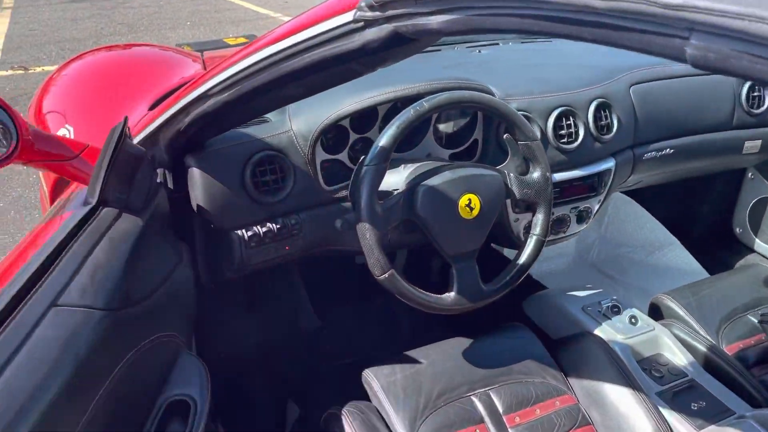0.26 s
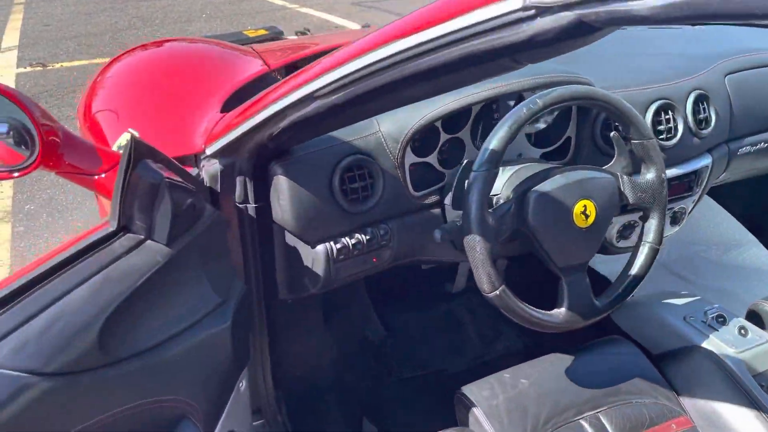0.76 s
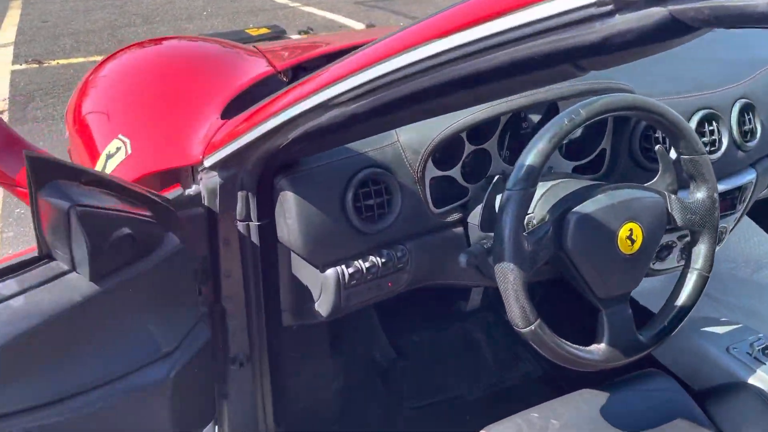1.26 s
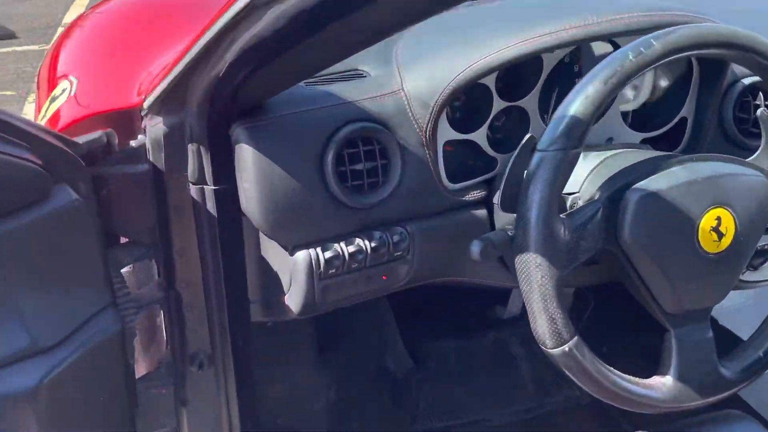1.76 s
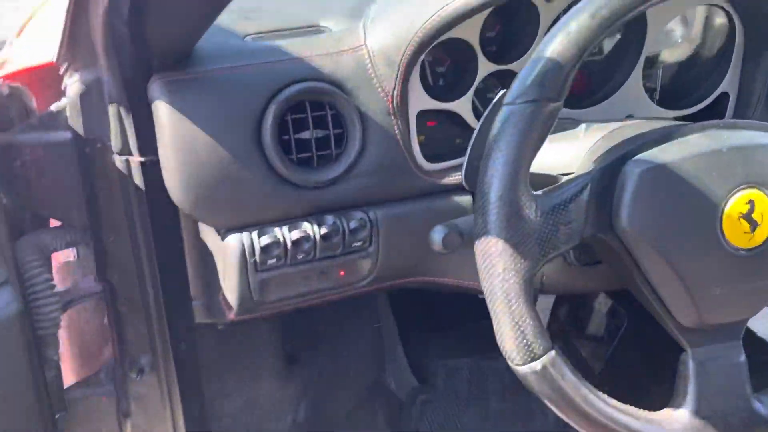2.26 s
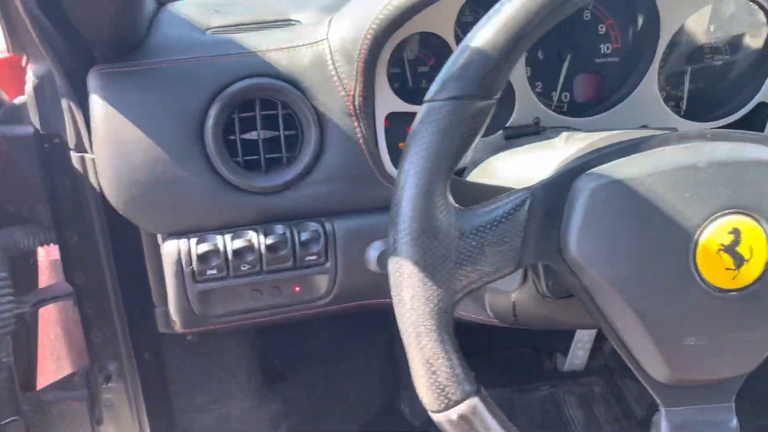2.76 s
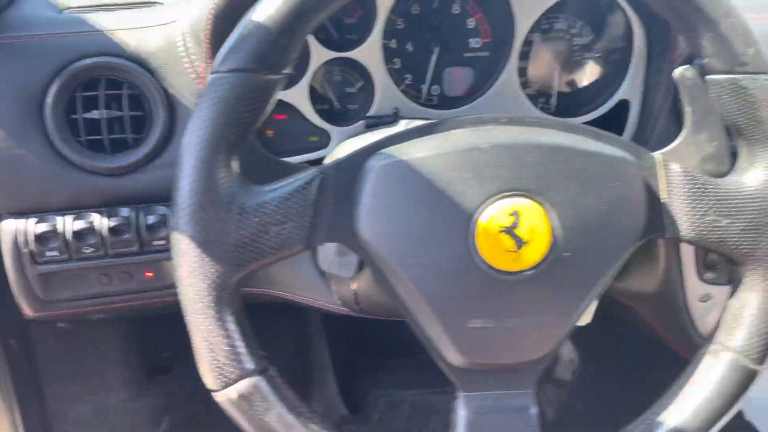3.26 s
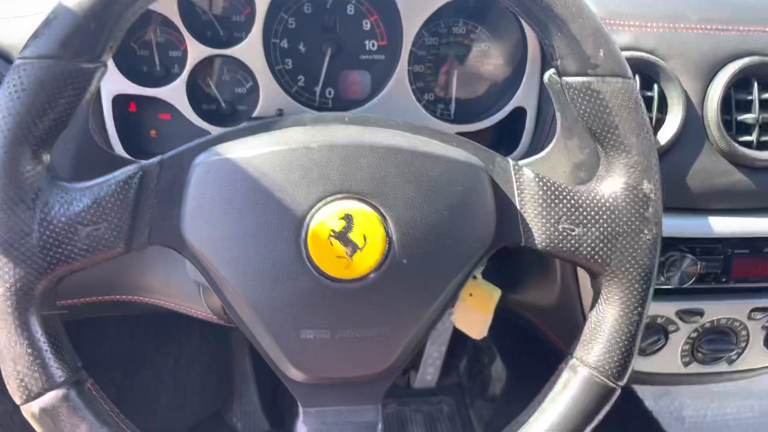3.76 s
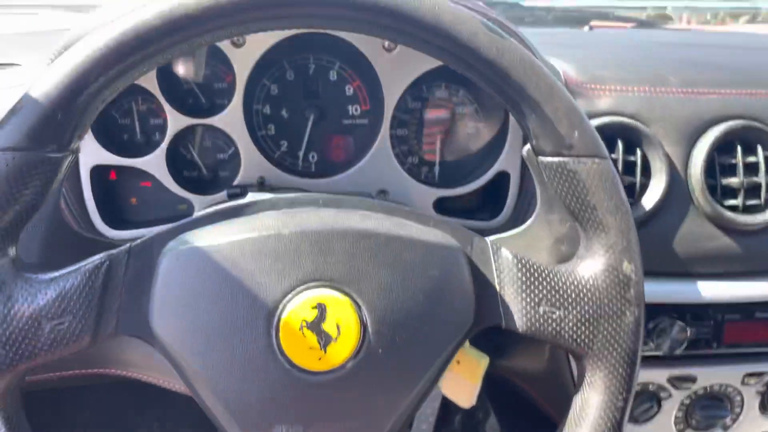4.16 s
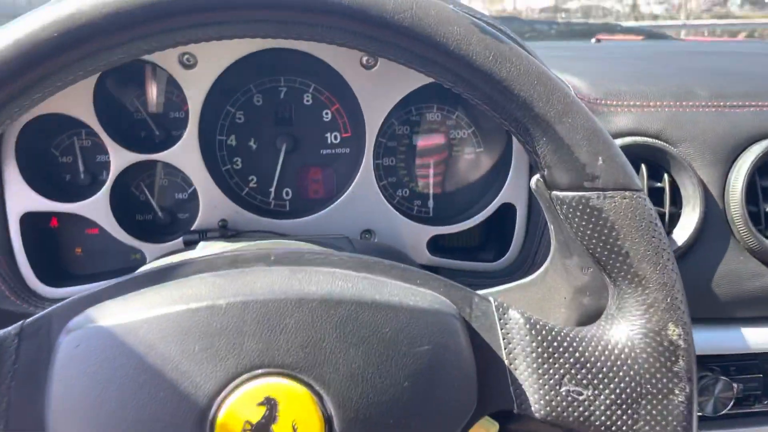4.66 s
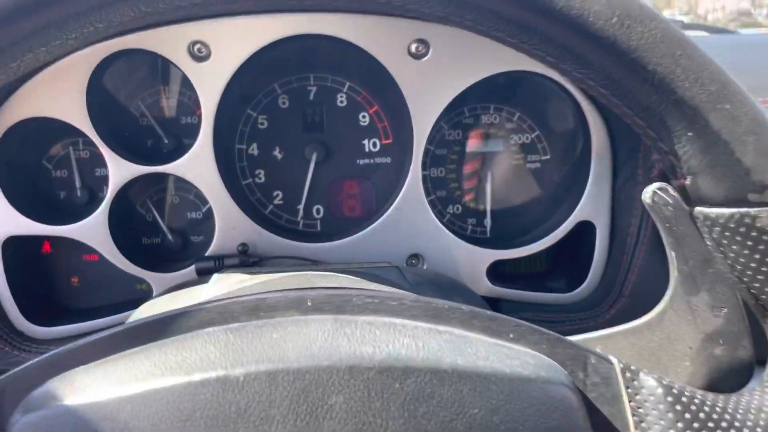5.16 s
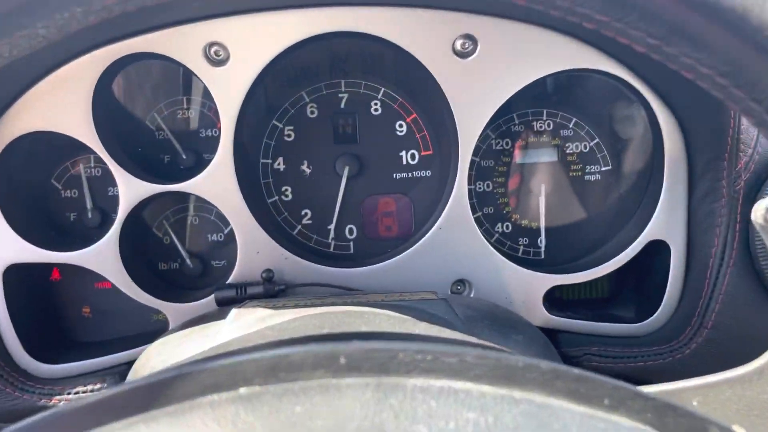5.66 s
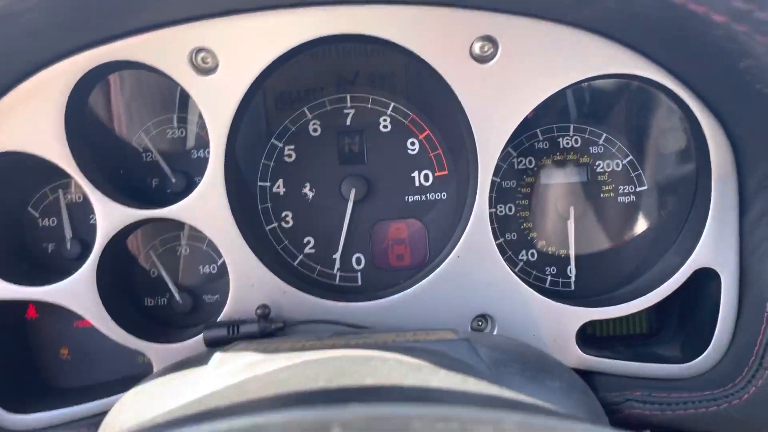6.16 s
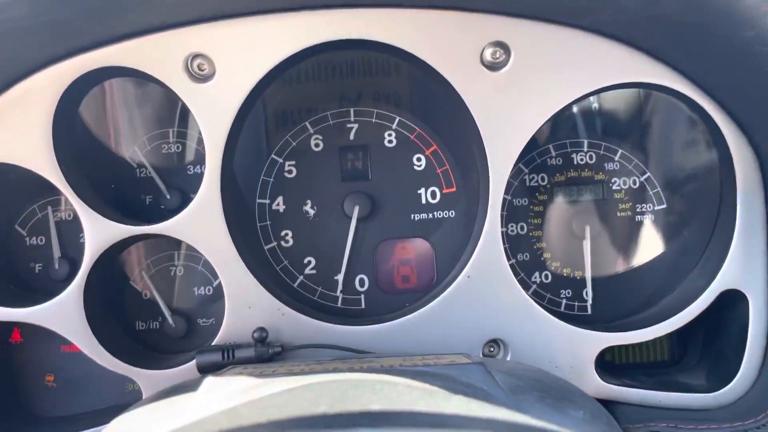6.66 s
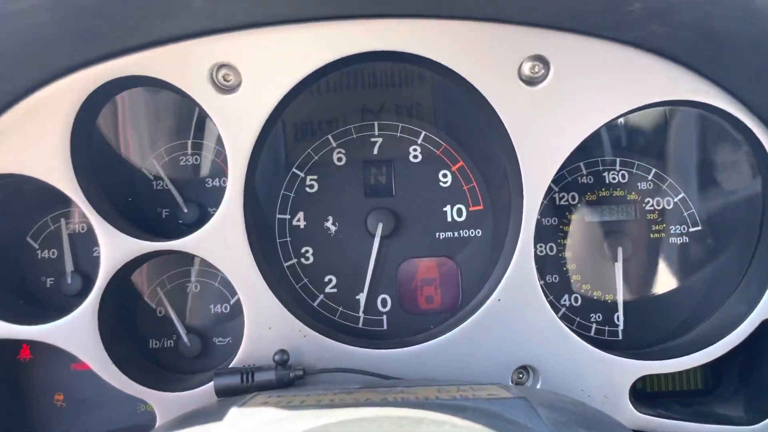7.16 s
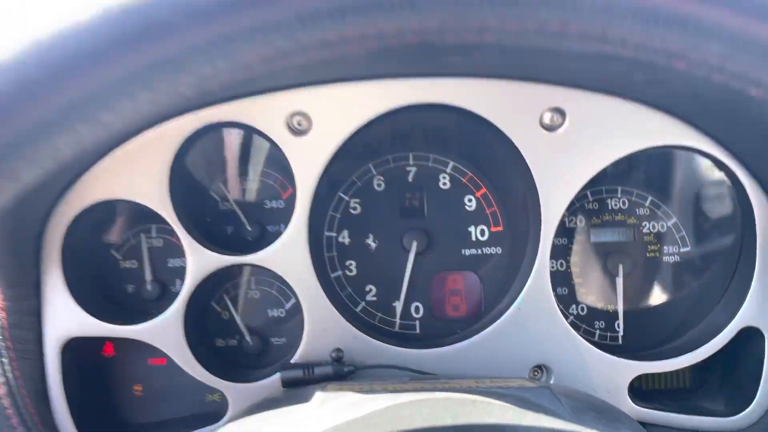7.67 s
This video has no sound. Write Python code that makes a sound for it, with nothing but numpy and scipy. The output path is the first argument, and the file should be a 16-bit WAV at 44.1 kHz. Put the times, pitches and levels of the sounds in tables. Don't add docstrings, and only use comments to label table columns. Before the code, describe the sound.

A sports car engine idles with a deep steady boom and airy hiss, wind buffeting the microphone early, one sharp click, then calmer inside the cabin.

```python
import sys
import numpy as np
from scipy import signal
from scipy.fft import rfft, irfft, next_fast_len
from scipy.io import wavfile
from scipy.ndimage import uniform_filter1d, minimum_filter1d

SR = 44100
rng = np.random.default_rng(int(sys.argv[2]) if len(sys.argv) > 2 else 0)


def persist_wave(psi):
    counts = np.round(np.clip(psi, -1, 1) * 32767).astype(np.int16)
    wavfile.write(sys.argv[1], SR, np.atleast_2d(counts).T)


def elevation(decibels):
    levels = np.asarray(decibels, float)
    return 10 ** (levels / 20)


N = 349272


def rms_one(x):
    return x / np.sqrt(np.mean(x ** 2) + 1e-20)


def in_time(rows):
    s, *columns = np.transpose(rows)
    return [np.interp(np.arange(N) / SR, s, column) for column in columns]


def at_hz(points, hz):
    table_hz, values = np.transpose(points)
    return np.interp(np.log(hz), np.log(table_hz), values)


def panned(db):
    return elevation(np.array([.5 * db, -.5 * db]))


def sheltered(depth, rule):
    outside_db, inside_db, bend = rule
    return outside_db + (inside_db - outside_db) * np.clip(depth, 0, 1) ** bend


def near(depth, place):
    centre, half_width, change = place
    return change * np.exp(-((depth - centre) / half_width) ** 2)


def drift(rate):
    r = np.exp(-80 * np.pi * rate / SR)
    white = rng.standard_normal(N // 40 + 2002)
    slow = signal.lfilter([1], [1, -2 * r, r * r], white)[2000:]
    return np.interp(np.arange(N) / 40, np.arange(len(slow)), rms_one(slow))


def resonance(x, hz, width_hz):
    r = np.exp(-np.pi * width_hz / SR)
    poles = [1, -2 * r * np.cos(2 * np.pi * hz / SR), r * r]
    return signal.lfilter([(1 - r * r) / 2, 0, (r * r - 1) / 2], poles, x)


def banded_noise(spectrum, likeness, patchy_db, rate):
    low, high = spectrum[0][0], min(spectrum[-1][0], .45 * SR)
    edges = np.geomspace(low, high, 10)
    out, together, white = 0, drift(rate), rng.standard_normal((2, 2, N))
    for k, band in enumerate(zip(edges, edges[1:])):
        band_pass = signal.butter(2, band, "band", fs=SR, output="sos")
        mid, side = signal.sosfilt(band_pass, white[k % 2])
        hz = np.sqrt(band[0] * band[1])
        alike = np.clip(at_hz(likeness, hz), 0, 1)
        gain = elevation(at_hz(spectrum, hz) + patchy_db * (.7 * together + drift(rate)))
        out = out + gain * (np.sqrt(1 + alike) * mid + np.sqrt(1 - alike) * side * [[1], [-1]])
    return rms_one(out)


def narrow_noise(hz, width_hz, steady=0):
    shared, own = rng.standard_normal((2, 1, N)), rng.standard_normal((2, 2, N))
    low = signal.butter(2, width_hz / 2, fs=SR, output="sos")
    along, across = rms_one(signal.sosfilt(low, shared + .9 * own))
    turn = 2 * np.pi * np.cumsum(hz) / SR
    return rms_one((along + 2 * steady) * np.cos(turn) + across * np.sin(turn))


def swells(starts, lengths, levels_db, rise, fall):
    t, power = np.arange(N) / SR, 1e-9
    for s, length, db in zip(starts, lengths, levels_db):
        shape = np.interp(t, [s - rise, s, s + length, s + length + fall], [0, 1, 1, 0])
        power = power + (elevation(db) * shape) ** 2
    return np.sqrt(power)


# (time [s], firing rate [Hz])
IDLE_SPEED = [(0, 68.7), (.95, 69.6), (1.7, 68.8), (2.6, 69.2), (2.9, 68.6), (3.1, 70.1), (3.5, 70.3),
              (3.7, 71.6), (3.9, 72.2), (4.3, 74.7), (4.5, 74.7), (4.75, 73.9), (5.1, 73.4), (5.9, 73.0),
              (6.3, 71.3), (6.7, 71.0), (7.1, 69.0), (7.92, 67.8)]


def firing():
    hz, = in_time(IDLE_SPEED)
    turn = 1.255 + 2 * np.pi * np.cumsum(hz * (1 + 0.0025 * drift(8.5))) / SR
    return hz, turn


# (time [s], firing rate [Hz, not played], firing tone [dB], second order [dB re firing tone])
BOOM_LEVELS = [(0, 68.67, -13, -9), (.95, 69.6, -22, -14), (1.2, 69.3, -24, -7), (1.7, 68.8, -30.5, -5),
               (2.25, 69.23, -35, 12.5), (2.6, 69.34, -25, -0.5), (2.9, 69, -20.5, 4),
               (3.15, 70.5, -18.5, -3), (3.56, 70.67, -19, -2), (3.7, 71.5, -17, -7),
               (4.18, 74.44, -18.5, -5), (4.9, 74.53, -17, -5), (5.64, 73.98, -16, -5),
               (6.05, 72.7, -16, -6), (6.8, 71.42, -14.5, -7), (6.95, 70.75, -15.5, -3.5),
               (7.45, 69.1, -15.5, -3.5), (7.92, 68.14, -15.5, -2.5)]
# (multiple of firing rate, level [dB re second order])
SIDE_ORDERS = [(.5, -20), (.75, -23), (1.75, -24), (2.5, -30), (3, -25), (3.5, -25), (4.5, -31), (5, -33),
               (8.5, -39)]
CABIN_MODE = (298.7, 13.8, 10.8)
FOURTH_ORDER_SHELTER, BOOM_PAN_SHELTER = (-58.5, -39, 0.87), (0.5, -3.5, 0.55)
DOORWAY = (0.51, .07, -4.5)
# (depth, half width, change [dB])
HALF_ORDER_PLACE, HALF_ORDER_FADE = (.68, .14, 5), (1, .05, -5)
# (phase at 69 Hz [rad], slope [rad per Hz])
SECOND_LEAD, FOURTH_LEAD = (-.27, .165), (-1.4, -.3)
SECOND_SPREAD = (.5, .13, .3)
FOURTH_SPREAD = .45


def exhaust_orders(hz, turn, depth):
    _, first_db, second_rel_db = in_time(BOOM_LEVELS)
    second_db = first_db + second_rel_db
    mode_hz, width_hz, mode_db = CABIN_MODE
    apart = np.array([[1], [-1]])

    def mode_lift(order):
        return mode_db * np.exp(-((order * hz - mode_hz) / width_hz) ** 2)

    def pipe_lead(rule):
        return rule[0] + rule[1] * (hz - 69)

    pan_db = sheltered(depth, BOOM_PAN_SHELTER) + near(depth, DOORWAY)
    boom = elevation(first_db + 0.5 * drift(19)) * np.sin(turn) * panned(pan_db)

    second_phase = 2 * turn + pipe_lead(SECOND_LEAD) + near(depth, SECOND_SPREAD) * apart
    upper = elevation(second_db + 1.3 * drift(18)) * np.sin(second_phase) * panned(-1.2)[:, None]

    half_db = -22.5 + 0.54 * first_db + near(depth, HALF_ORDER_PLACE) + near(depth, HALF_ORDER_FADE)
    upper += elevation(half_db + 1.8 * drift(8)) * np.sin(3 * turn / 2)

    fourth_db = sheltered(depth, FOURTH_ORDER_SHELTER) + 0.74 * mode_lift(4)
    fourth_phase = 4 * turn + pipe_lead(FOURTH_LEAD) + FOURTH_SPREAD * apart + .25 * drift(10)
    upper += elevation(fourth_db + 1.5 + 1.5 * drift(14)) * np.sin(fourth_phase)

    base_db = uniform_filter1d(second_db, size=SR)
    for multiple, db in SIDE_ORDERS:
        order = np.round(4 * multiple) / 4
        level_db = base_db + db + mode_lift(order) + 0.77 * drift(15.0)
        upper += elevation(level_db) * np.sin(order * turn + .5 * drift(9.5))
    return np.sqrt(2) * (boom + upper)


# (frequency [Hz], density [dB per Hz])
RUMBLE = [(25, -11), (45, 3), (70, 3), (110, -7), (170, -7), (240, -8), (330, -17.5), (420, -27.5),
          (600, -36.5)]
RUMBLE_SHELTER = (-30, -29, 3.4)


def exhaust_rumble(depth):
    likeness = [(50, 0.9), (200, 0.39), (400, 0.19)]   # (Hz, left-right likeness)
    return elevation(sheltered(depth, RUMBLE_SHELTER)) * banded_noise(RUMBLE, likeness, patchy_db=1.5, rate=11.0)


# (frequency [Hz], density [dB per Hz])
HISS = [(350, -15), (500, -6), (700, -4.5), (1000, -8), (1500, -9.5), (2100, -16), (2700, -32), (3400, -7)]
BRIGHT = [(3200, -3), (4200, 1), (5500, -2.5), (7500, -6.5), (9500, -11), (12000, -10), (13500, -24.5),
          (15000, -18), (16000, -24)]
# (frequency [Hz], left-right likeness [0-1])
BAY_LIKENESS = [(300, 0.19), (800, 0.55), (1200, 0.81), (1700, .35), (2400, 0.76), (3800, 0.15),
                (5000, 0.93), (6000, 0.77), (7500, 1), (16000, 0.55)]
HISS_SHELTER, BRIGHT_SHELTER = (-36, -46.5, 1), (-56, -66, 2)
BRIGHT_GAP = (.52, 0.04, 3)


def valve_gear(depth):
    hiss = banded_noise(HISS, BAY_LIKENESS, patchy_db=1.02, rate=14)
    bright = banded_noise(BRIGHT, BAY_LIKENESS, patchy_db=1.27, rate=16.0)
    bright_db = sheltered(depth, BRIGHT_SHELTER) + near(depth, BRIGHT_GAP)
    return elevation(sheltered(depth, HISS_SHELTER)) * hiss + elevation(bright_db) * bright


def whine(rows, steady_db, width_hz, bed):
    out = elevation(steady_db) * narrow_noise(np.full(N, bed[0]), bed[1])
    for s, length, db, hz in rows:
        gain = swells([s], [length], [db], rise=0.032, fall=0.14)
        out += gain * narrow_noise(hz + 4 * drift(9), width_hz, steady=.8)
    return out


# (start [s], length [s], level [dB], pitch [Hz])
LOW_SWELLS = [(.2, .35, -45.5, 1128), (.4, .7, -44.5, 1085), (.45, .45, -42, 1039), (1.45, 0.22, -45, 948),
              (1.5, 0.6, -52, 1085), (1.95, 0.19, -43.5, 1129), (2.28, .55, -42.5, 1091),
              (2.5, 0.44, -50, 1140), (2.95, .55, -44, 1082), (3.7, .25, -51, 1131), (4.6, .7, -48.5, 1070),
              (4.6, 0.6, -51.5, 1147), (5.35, .55, -51.5, 1085), (7.68, .3, -47, 1044),
              (7.7, .3, -50, 1122)]
HIGH_SWELLS = [(.08, 0.06, -54, 2067), (.55, 0.24, -51.5, 1958), (1.05, .1, -53, 2004),
               (1.45, .2, -53.5, 2000), (2.2, 0.31, -51, 2065), (2.55, .25, -57, 1985),
               (3.03, 0.37, -54.5, 1985), (3.05, .4, -59.5, 2144), (3.6, 0.98, -56, 2044),
               (4.3, .35, -60, 1963), (4.7, 1.3, -62.5, 2213), (5.6, 1.1, -66, 1984),
               (6.9, 0.43, -60.5, 2092), (7.6, .3, -59.5, 2194)]
# (start [s], length [s], level [dB], pitch [Hz])
SQUEAKS = [
    (5.66, .05, -69, 4370),
    (5.78, .06, -75, 4390),
    (6.03, .05, -72, 4310),
    (6.17, .04, -69, 4300),
]
WHINE_WIDTHS = [42, 40]
# (centre [Hz], width [Hz])
WHINE_BEDS = [(1095, 120), (2050, 160)]
LOW_WHINE_SHELTER, HIGH_WHINE_SHELTER = (-41.5, -57.5, 1.1), (-62, -61, 1.1)


def belt_whines(turn, throb, depth):
    low = whine(LOW_SWELLS, sheltered(depth, LOW_WHINE_SHELTER), WHINE_WIDTHS[0], WHINE_BEDS[0])
    high = whine(HIGH_SWELLS, sheltered(depth, HIGH_WHINE_SHELTER), WHINE_WIDTHS[1], WHINE_BEDS[1])
    squeaks = whine(SQUEAKS, -84, 90, (4340, 150))
    return elevation(2.5 * np.sin(turn / 2)) * low + throb * high + squeaks


OPEN_BAND_SHELTER, PANEL_SHELTER = (-43.5, -80, 2.2), (-59.5, -57, 0.28)
BLOCK_BAND_SHELTER = (-40.5, -61.5, 1.7)


def bay_drones(depth):
    out = elevation(sheltered(depth, OPEN_BAND_SHELTER)) * narrow_noise(np.full(N, 1430), 550)
    out += elevation(sheltered(depth, PANEL_SHELTER)) * narrow_noise(np.full(N, 2280), 650)
    out += elevation(sheltered(depth, BLOCK_BAND_SHELTER)) * narrow_noise(np.full(N, 500), 170)
    return out


def engine_bay(turn, depth):
    throb = elevation(0.4 * np.sin(turn / 2) + 0.44 * np.sin(turn))
    return throb * (valve_gear(depth) + belt_whines(turn, throb, depth) + bay_drones(depth))


ECHO_WHINE_SHELTER = (-60, -52.5, 1.2)


def echoed_whine(depth):
    echo = narrow_noise(np.full(N, 1085), 110)[0] * [[1], [-1]]
    return elevation(sheltered(depth, ECHO_WHINE_SHELTER)) * echo


# (start [s], length [s], strength [dB], fine eddies [dB re strength],
# finest eddies [dB re fine])
GUSTS = [(0, 0.053, -8.5, -13, -4), (0.087, 0.086, -12, -11, -8), (0.212, 0.063, -12, -15.5, -4.5),
         (.3, 0.19, -13.5, -13.5, -8), (0.508, 0.028, -16.5, -7, -8), (0.548, 0.063, -13, -9, -9),
         (0.656, 0.12, -10, -11, 0.5), (0.802, 0.0099, -16.5, -3.5, 0.5), (0.839, 0.045, -11, -16.5, 3.5),
         (0.912, 0.064, -13.5, -17.5, -2), (0.992, 0.123, -13, -11, 1.5), (1.135, .065, -18.5, -8.5, 1.5),
         (1.208, 0.098, -20.5, -9, -0.5), (1.35, 0.045, -17.5, -9.5, -2.5), (1.51, 0.029, -17, -12, 3),
         (1.567, 0.026, -30.5, -1.5, 0.5), (1.635, 0.028, -31.5, -5, 7.5), (1.697, 0.31, -29, -17.5, 1),
         (4.2, 0.47, -22.5, -14.5, -17.5), (4.689, 0.063, -14, -28, -9), (4.861, .1, -22, -36, -8)]
# (start [s], length [s], strength [dB], fine eddies [dB re strength])
DRAUGHTS = [
    (2.029, 0.024, -14.5, -22),
    (2.078, 0.043, -23.5, -13.5),
    (2.131, 0.033, -17, -15),
    (2.249, 0.021, -16.5, -12.5),
    (2.304, 0.076, -22, -14.5),
    (2.424, .05, -15.5, -15.5),
    (2.516, .04, -16, -17),
    (2.591, .05, -19.5, -11),
    (2.661, 0.029, -14.5, -7.5),
    (2.778, 0.091, -25.5, -13.5),
]
# (frequency [Hz], density [dB per Hz])
BUFFET = [(22, -16.5), (40, -8.5), (65, -5), (100, 0), (150, -15), (220, -29.5)]
FLUTTER = [(140, -16), (180, -0.5), (240, -1.5), (300, -9.5), (340, -19.5)]
UPPER_FLUTTER = [(280, -2.5), (330, 0.5), (440, -0.5), (500, -8.5), (580, -25), (800, -29.5)]
# (frequency [Hz], left-right likeness [0-1])
WIND_LIKENESS = [(50, .98), (100, .76), (250, .66), (400, .4), (600, .05)]


def gusts():
    draughts = [(*row, -5) for row in DRAUGHTS]
    s, length, db, fine_db, finest_db = np.transpose(list(GUSTS) + draughts)

    def gain(levels_db):
        return swells(s, length, levels_db, rise=.012, fall=.025)

    deep = np.arange(len(s)) < len(GUSTS)
    buffet = banded_noise(BUFFET, WIND_LIKENESS, patchy_db=1.2, rate=8)
    thinning = signal.butter(2, 110, "high", fs=SR, output="sos")
    thin = rms_one(signal.sosfilt(thinning, buffet))
    out = gain(np.where(deep, db - 3, -99)) * buffet
    out += gain(np.where(deep, -99, db - 3)) * thin
    out += gain(db + fine_db) * banded_noise(FLUTTER, WIND_LIKENESS, patchy_db=1.5, rate=16)
    finest = banded_noise(UPPER_FLUTTER, WIND_LIKENESS, patchy_db=3.0, rate=37)
    return out + gain(db + fine_db + finest_db) * finest


# (start [s], length [s], peak [dB], start pitch [Hz], end pitch [Hz])
SWIPES = [
    (.038, .017, -5.5, 560, 109),
    (.805, .018, -3.5, 433, 197),
    (1.353, .02, -13, 522, 171),
    (1.529, 0.0158, -11, 380, 167),
    (2.676, .013, -7.5, 337, 194),
]


def swipes():
    out = np.zeros(N)
    for s, length, db, start_hz, end_hz in SWIPES:
        share = np.linspace(0, 1, round(length * SR))
        turn = 2 * np.pi * np.cumsum(start_hz * (end_hz / start_hz) ** share) / SR
        at = round(s * SR)
        out[at:at + len(share)] += elevation(db) * np.sin(np.pi * share) ** 1.5 * np.sin(turn)
    return out


# (time [s], peak [dB], pitch [Hz], left-right [dB])
SLAPS = [(0.49, -17.5, 220, 3), (0.662, -8, 228.5, -5), (0.7, -10, 480, 2), (.8, -13.5, 560, 0),
         (1.2, -27, 690, -1), (0.715, -9, 360, 0), (0.721, -8.5, 240, -2), (0.78, -14, 380, 0),
         (1.022, -16, 360, 0), (1.086, -12.5, 350, 0), (.151, -13, 258, -3), (.582, -14.5, 300, 1),
         (1.32, -15, 190, 3), (1.577, -17.5, 400, 4), (2.33, -22.5, 420, 7), (2.085, -30, 450, 0),
         (2.668, -14.5, 256, 0), (1.985, -28, 690, 0), (1.11, -12.5, 293, 3), (1.135, -14.5, 377, 0.0),
         (1.5, -12, 262, -2), (1.566, -20, 227, -8), (1.637, -25.5, 330, 1), (2.537, -15.5, 240, 4),
         (1.355, -22, 560, 9), (1.64, -19, 580, 0), (1.973, -24, 753.5, 7), (2.06, -26, 800, 3),
         (5.633, -35, 600, 5)]


def slaps():
    out = np.zeros((2, N))
    for s, db, hz, pan_db in SLAPS:
        t = np.arange(round(4 / hz * SR)) / SR
        cycles = t * hz - 2
        sagging = cycles * (1 - .16 * cycles / 2)
        slap = np.cos(2 * np.pi * sagging) * np.exp(-(cycles / .8) ** 2)
        at = round((s - .9 / hz) * SR)
        out[:, at:at + len(t)] += elevation(db + 1.0) * slap * panned(pan_db)[:, None]
    return out


def ticks(touches, body_db, hz):
    out, t = np.zeros((2, N)), np.arange(3000) / SR
    crack = signal.butter(2, [3300, 11000], "band", fs=SR, output="sos")
    noises = rng.standard_normal((len(touches), 3, len(t)))
    for (s, db, t60, pan_db), noise in zip(touches, noises):
        burst = (noise[0] + .5 * noise[1:]) * elevation(-60 * t / max(t60, .004))
        bright = signal.sosfilt(crack, 0.054 * burst + 1.0 * resonance(burst, 4700, 1200))
        tick = bright + elevation(body_db + 8) * resonance(burst, hz, 1300)
        at = round(s * SR)
        out[:, at:at + len(t)] += elevation(db - 4.5) * tick * panned(pan_db)[:, None]
    return out


# (time [s], peak [dB], decay t60 [s], left-right [dB])
TICKS = [(0.498, -38, 0.021, 5.5), (0.5196, -36, 0.027, -1), (0.695, -29, 0.044, 3.5),
         (1.6664, -34, 0.031, 3), (1.98, -39, .038, -3.5), (2.06, -37.5, 0.022, -5.5),
         (3.5911, -34, 0.022, 1), (3.67, -40, .02, 5), (3.691, -44.5, 0.011, -7), (3.7676, -34, .03, 3.5),
         (3.7881, -33, .029, 3), (3.795, -28.5, .045, -0.5), (3.8111, -37, 0.039, 10.5),
         (3.8224, -36.5, 0.028, 3), (4.2475, -35, .03, 4.5), (4.495, -48, .02, 3.5),
         (4.919, -44, 0.016, -3.5), (5.0438, -38, 0.025, 1), (5.6696, -50, 0.02, -14.5),
         (6.1288, -43.5, .032, -6)]


def trim_ticks():
    return ticks(TICKS, body_db=-2, hz=3280)


# (time [s], peak [dB], decay t60 [s], left-right [dB])
JINGLES = [
    (0.6912, -32, 0.012, 3),
    (0.7402, -40, 0.039, -1.5),
    (0.818, -40, .035, 0),
    (3.823, -41.5, 0.018, -1.5),
    (3.834, -41, 0.018, 0.5),
    (4.2463, -38, 0.031, 3),
]


def key_jingles():
    return ticks(JINGLES, body_db=0, hz=9800)


LATCH = (.6912, -22.5, 0)
# (frequency [Hz], level [dB], decay t60 [s])
LATCH_MODES = [(2912, -3, .018), (3600, -4, .012), (4592, -6, .016), (5087, 0, .022), (5992, -1, .018),
               (7200, -7, .012), (8516, -7, .012), (9700, -5, .014), (10410, -16, .07), (12050, -10, .01)]


def latch():
    s, db, pan_db = LATCH
    out, t = np.zeros((2, N)), np.arange(4000) / SR
    ring = 0
    for k, (hz, level_db, t60) in enumerate(LATCH_MODES):
        ring = ring + elevation(level_db - 8 - 60 * t / t60) * np.sin(2 * np.pi * hz * t + k * k)
    ring = ring * (1 - np.exp(-t / .0004))
    for after, loss_db in [(0, 0), (.0035, -11)]:
        for side in (0, 1):
            at = round((s + after + side * .00005) * SR)
            out[side, at:at + len(t)] += elevation(db + 3 + loss_db) * ring * panned(pan_db)[side]
    return out


# (centre [s], pitch [Hz], glide [Hz per s], level [dB], half length [s])
WHISTLES = [
    (5.14, 10300, 0, -72, .035),
    (6.13, 11930, 4, -89, 1.8),
    (6.2, 449, -2, -52, 1.95),
    (3.2, 196, 5.5, -39, .73),
]


def whistles():
    out = np.zeros((2, N))
    for s, hz, glide, db, half in WHISTLES:
        t = np.arange(N) / SR - s
        tone = np.sin(2 * np.pi * (hz + glide * t / 2) * t + 0.88 * drift(13))
        out += elevation(db + 2.3 * drift(21)) * tone * np.exp(-(t / half) ** 4)
    return out


# (time [s], peak [dB], decay t60 [s], left-right [dB])
KNOCKS = [
    (3.832, -34, 0.026, 1.5),
    (4.255, -45, .015, -1),
]


def housing_knocks():
    return ticks(KNOCKS, body_db=4.6, hz=1400)


# (frequency [Hz], right port's lead [half turns])
PORT_PHASE = [(100, 0), (500, -.25), (1100, -.45), (1550, -1), (2500, -2), (3600, -2.35), (5000, -2),
              (5800, -1.9), (6800, -1.05), (7900, -.95), (9200, -.45), (10300, -.05), (12200, .05),
              (13200, .6), (14200, 1)]


def ports(x):
    size = next_fast_len(N)
    hz = np.maximum(np.arange(size // 2 + 1) * SR / size, 1)
    lead = np.exp(.5j * np.pi * at_hz(PORT_PHASE, hz))
    return irfft(rfft(x, size) * [1 / lead, lead], size)[:, :N]


# (time [s], depth [0-1])
DEPTH = [(0, 0.09), (.8, 0.17), (1.6, 0.29), (2.3, .45), (3, 0.56), (3.5, 0.59), (4.2, 0.65), (5, 0.81),
         (6.4, 0.97), (7.15, 1), (7.6, 0.98), (7.92, .85)]


def scene():
    depth, = in_time(DEPTH)
    hz, turn = firing()
    exhaust = exhaust_orders(hz, turn, depth) + exhaust_rumble(depth)
    wind = gusts() + swipes() + slaps()
    airborne = engine_bay(turn, depth) + trim_ticks() + key_jingles() + whistles()
    return exhaust + wind + latch() + housing_knocks() + ports(airborne) + echoed_whine(depth)


def top_cut(x):
    return signal.sosfilt(signal.butter(12, 15800, fs=SR, output="sos"), x)


def record(dry):
    heard = signal.sosfilt(signal.butter(2, 33, "high", fs=SR, output="sos"), dry)
    span = round(.006 * SR)
    gain = np.minimum(1, .89 / (np.abs(heard).max(axis=0) + 1e-9))
    gain = uniform_filter1d(minimum_filter1d(gain, size=span), size=span)
    return top_cut(heard * gain)


dry = scene()
out = record(dry)
persist_wave(out)
```